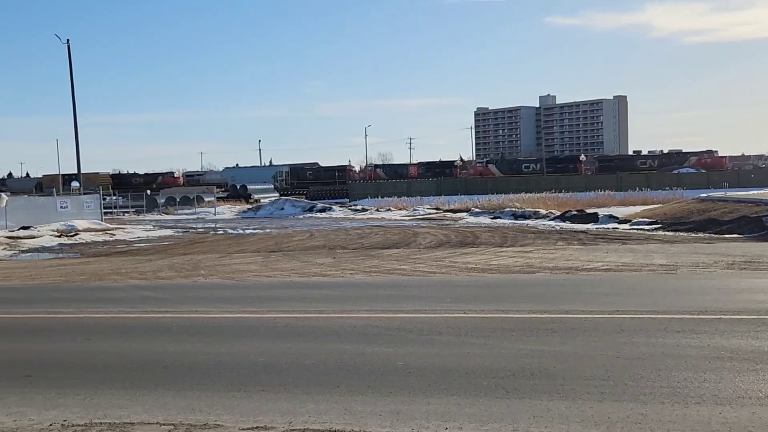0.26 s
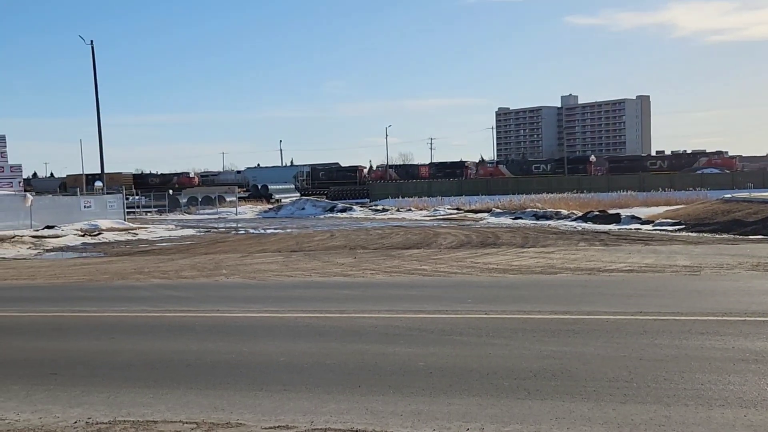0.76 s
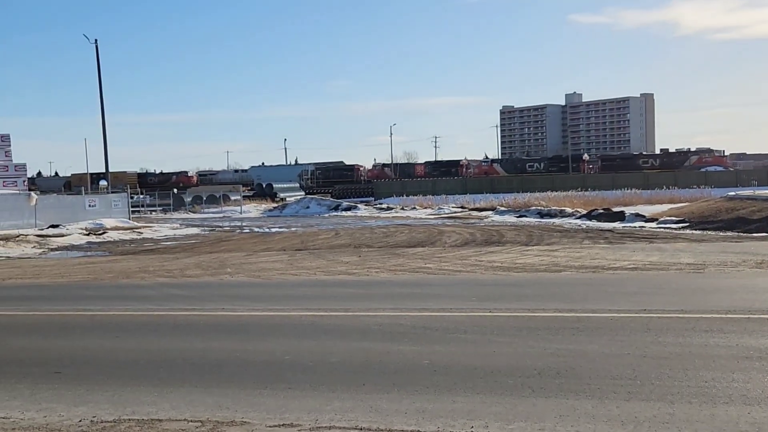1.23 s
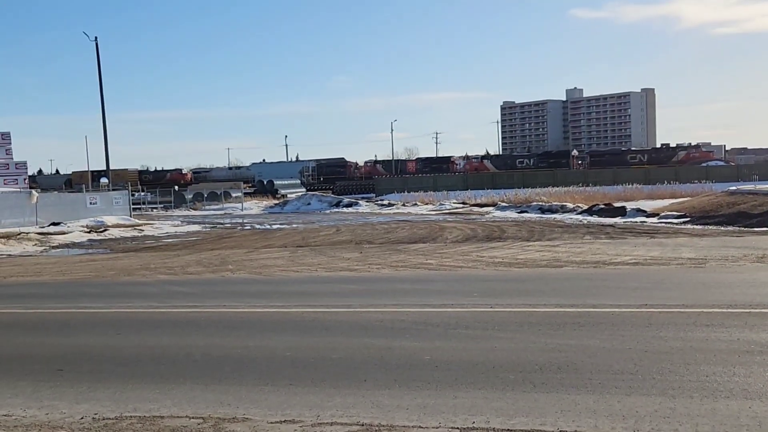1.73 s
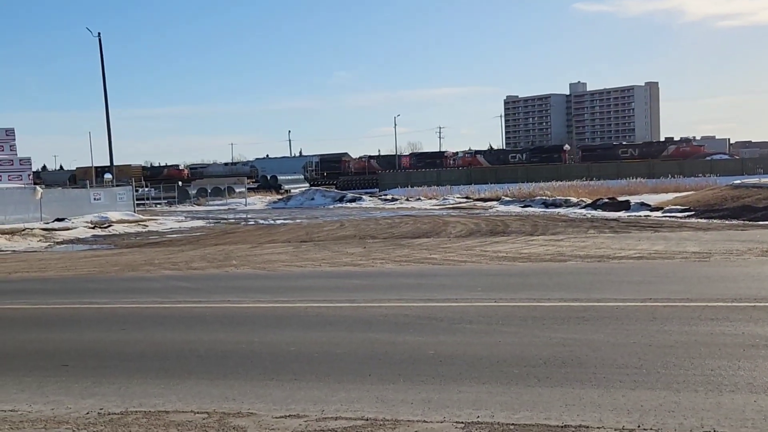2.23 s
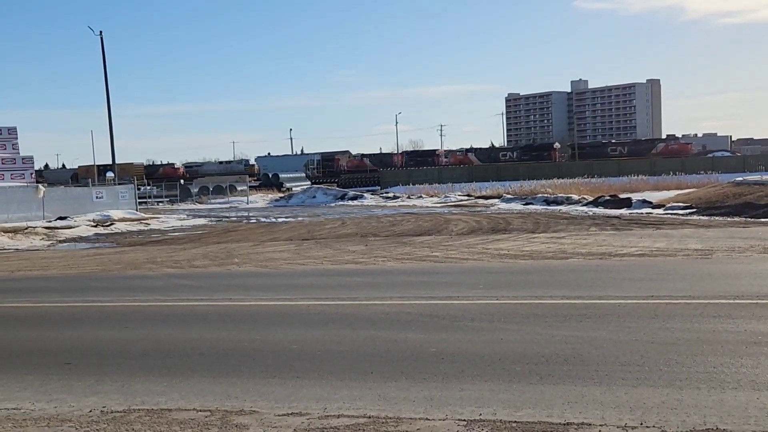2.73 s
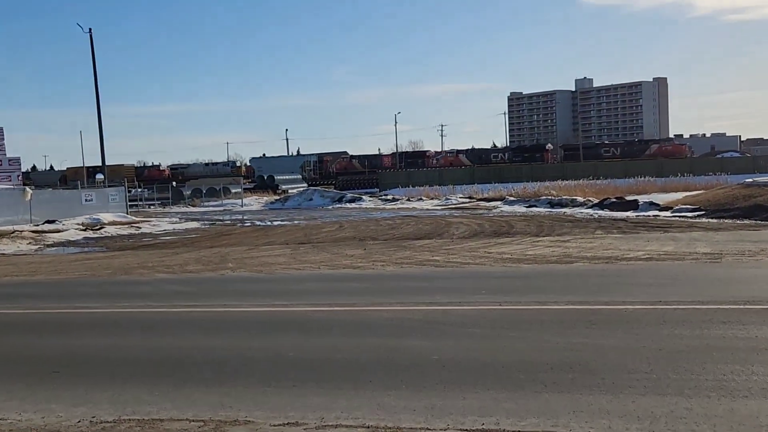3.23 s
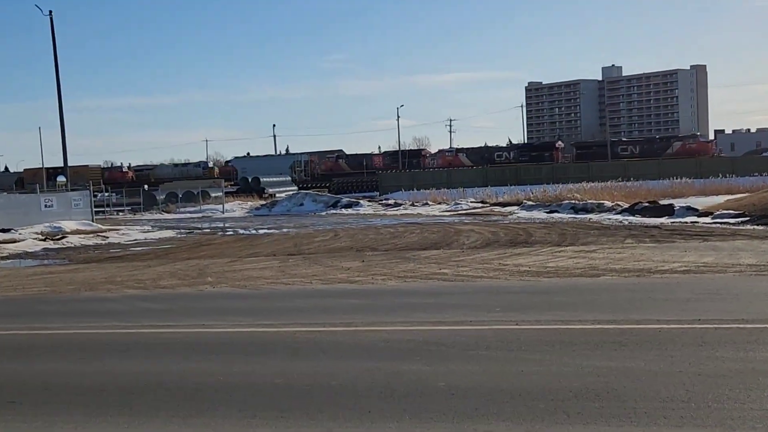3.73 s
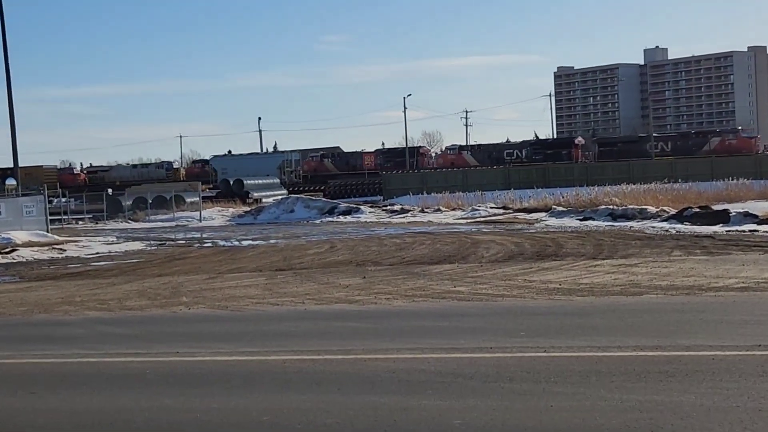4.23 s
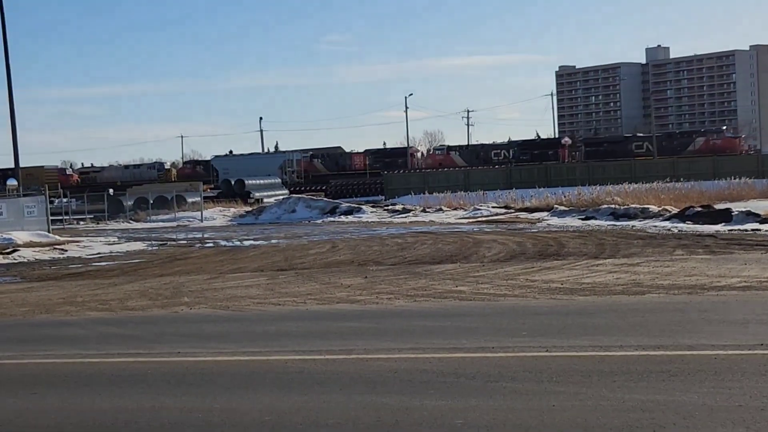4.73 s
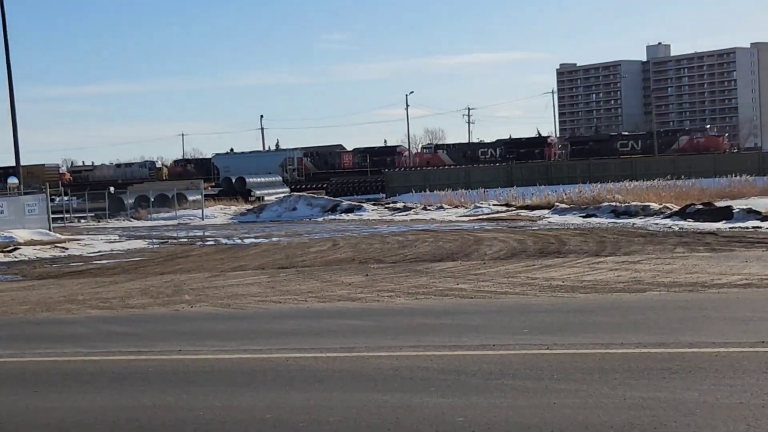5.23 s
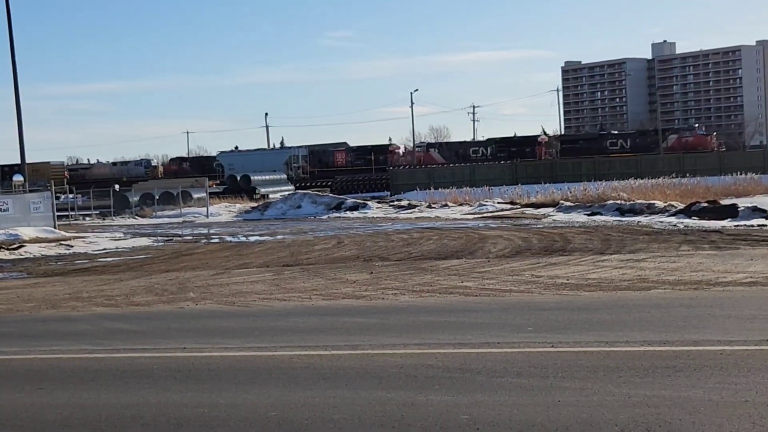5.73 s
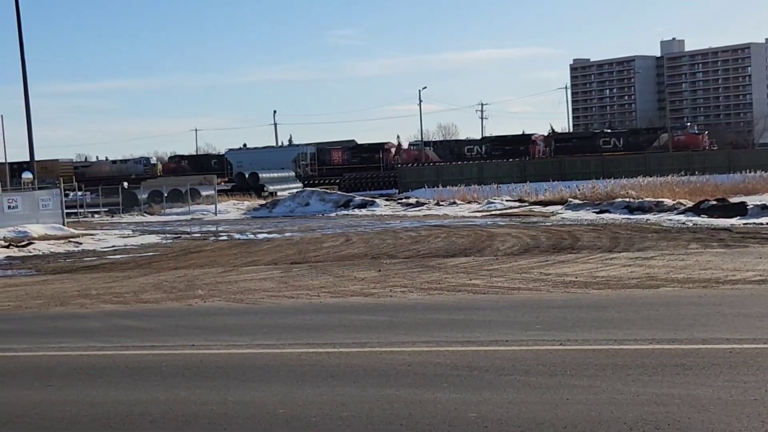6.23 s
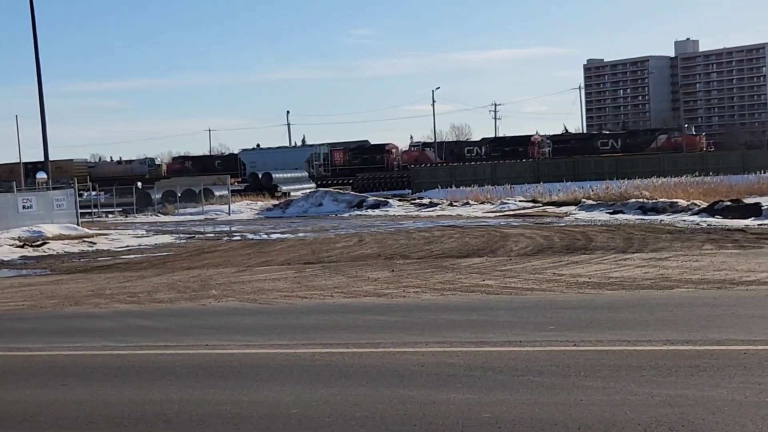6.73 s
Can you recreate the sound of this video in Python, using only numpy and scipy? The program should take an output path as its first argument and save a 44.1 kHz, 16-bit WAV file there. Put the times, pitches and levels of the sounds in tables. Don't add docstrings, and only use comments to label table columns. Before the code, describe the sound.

Freight locomotives rumble slowly across an open yard, wheels banging and ringing, as road noise recedes and fingers tick on the handheld phone.

```python
import sys
import numpy as np
from scipy import signal
from scipy.fft import rfft, irfft
from scipy.io import wavfile
from scipy.ndimage import uniform_filter1d

SR = 44100
rng = np.random.default_rng(int(sys.argv[2]) if len(sys.argv) > 2 else 0)


def boost(x):
    u = np.asarray(x, float) / 20
    return 10 ** u


def output_pcm(signal):
    pcm = np.clip(np.atleast_2d(signal).T, -1, 1) * 32767
    wavfile.write(sys.argv[1], SR, np.round(pcm).astype(np.int16))


N = 307377
FREQ = np.arange(N // 2 + 1) * SR / N + 1e-3
TIME = np.arange(N) / SR
ROAD, YARD = 1, 2


def curves(table):
    s, *columns = np.transpose(table)
    return [np.interp(TIME, s, column) for column in columns]


def along(table, axis=1):
    points = np.array(table)
    return np.interp(np.log(FREQ), np.log(points[:, 0]), points[:, axis])


def walk(rate):
    hold = int(SR / rate)
    steps = np.repeat(rng.standard_normal(N // hold + 1), hold)
    return 1.42 * uniform_filter1d(uniform_filter1d(steps, hold), hold)[:N]


def bell(start_s, length_s):
    return np.exp(-((TIME - start_s) / length_s) ** 2)


def ports(x, other, direction):
    # freq_hz, road left minus right [dB], yard left minus right [dB], yard likeness [0-1]
    shadow = [(323, 2, 0, 1), (560, -3.5, 0, 0.4), (980, -0.5, -1.5, 0.3), (1720, 0, -2, 0.7),
              (2280, -13.5, -4.5, 0.6), (3000, 5.5, 2, 0.6), (4300, 5.5, 1.5, 0), (6500, 6, 1.5, 0.1),
              (7840, -5.5, -7.5, 0.6), (12000, 1.5, 7.5, 0.4)]
    # freq_hz, road left lead [rad], yard left lead [rad], road likeness [0-1]
    bearing = [(340, 0.34, -0.0099, 0.7), (525, 0.44, 0.35, 0.4), (890, 1.92, -1.4, 1),
               (1020, 3.43, -0.27, 0.66), (1410, 3.31, -1, 0.86), (1740, 4.02, -0.64, .85),
               (1920, 3.6, 0, 0.5), (2120, 6, -0.76, 0.5), (2210, 6.5, -.4, 0.93), (2600, 7.5, -.4, 0.2),
               (3400, 11.2, -0.78, 0.7), (4000, 10.5, 0.19, 0.17), (5360, 16, -1.5, 1),
               (12000, 69, -2.9, 0.9)]
    like = np.clip(along(bearing if direction == ROAD else shadow, axis=3), 0, 1)
    turn = np.exp(.5j * along(bearing, direction))
    tilt = boost(along(shadow, direction) / 2)
    mid = np.sqrt((1 + like) / 2) * x
    side = np.sqrt((1 - like) / 2) * other
    return np.array([(mid + side) * turn * tilt, (mid - side) / turn / tilt])


def roar(colour, direction, swell_db, flicker_db, rate, hiss_db=np.zeros(N)):
    low_hz, high_hz = colour[0][0], colour[-1][0]
    gain = boost(along(colour)) * (FREQ > low_hz) * (FREQ < 1.1 * high_hz)
    both = ports(*rfft(rng.standard_normal((2, N))), direction) * gain
    norm = np.std(irfft(both, N))
    swell = walk(1.5)
    place = 2 * np.log2(FREQ)
    out = 0
    for band in range(int(2 * np.log2(low_hz)), int(2 * np.log2(high_hz)) + 2):
        part = irfft(both * np.clip(1 - abs(place - band), 0, 1), N)
        top = np.clip(band / 2 - np.log2(1000), 0, 1)
        flicker = flicker_db * (3 + 0.32 * top) * walk(rate)
        hiss = top * (1 + 0.35 * max(band / 2 - np.log2(4000), 0)) * hiss_db
        out = out + part * boost(swell_db * swell + flicker + hiss)
    return out / norm


def high_washes():
    # start_s, level_db, length_s
    washes = [(1.57, -72, 0.03), (0.01, -70, .15), (2.063, -73.5, .07), (2.553, -70, 0.032),
              (4.089, -73.5, .05), (4.829, -73.5, .05), (4.986, -76, .01), (5.046, -70, .05),
              (5.243, -75, 0.027), (5.383, -80.5, 0.13), (6.358, -79, 0.14), (6.658, -80.5, .04),
              (6.91, -75.5, 0.023)]
    pressure = boost(-98)
    for s, db, length in washes:
        rise = np.clip((TIME - s) / .012, 0, 1)
        pressure = pressure + boost(db) * rise * np.exp(-np.clip(TIME - s, 0, 1) / length)
    high_band = np.exp(-((FREQ - 12800) / 3000) ** 2 / 2)
    hiss = rfft(rng.standard_normal((2, N))) * high_band / np.sqrt(np.mean(high_band ** 2))
    return irfft(hiss, N) * pressure


def ticks():
    # start_s, peak_db, pitch_hz, width_hz, left minus right [dB]
    clicks = [(.059, -49, 11600, 2900, 4.5), (.135, -61, 13500, 2500, 5), (.208, -56.5, 14300, 2480, 1.5),
              (.357, -57.5, 14000, 3000, 3.5), (.431, -57, 14000, 3000, 6), (1.128, -45, 6360, 800, 17.5),
              (1.127, -49.5, 10500, 4500, 1.5), (1.573, -55, 13800, 3000, 4), (2.08, -57.5, 14000, 3000, 6),
              (4.083, -41, 12000, 5010, 9), (4.084, -48, 12200, 1200, 7), (4.083, -45.5, 6200, 2500, 7),
              (4.108, -59, 10000, 3600, -4), (4.6, -50, 5900, 5000, -1), (4.967, -62, 8000, 1996, 0),
              (5.0092, -32, 14600, 1800, 21), (5.0105, -47, 14500, 700, 23.5),
              (4.9965, -65.5, 14500, 2500, 19), (5.536, -55, 9500, 2000, -2), (5.715, -68, 9700, 1500, 0),
              (3.2586, -68, 11000, 3000, 0), (5.952, -69, 9500, 2000, -4), (4.091, -63, 12000, 4000, -2),
              (1.579, -57, 10800, 1200, 2), (1.58, -57, 13000, 1200, 2.5),
              (5.0097, -48.5, 11800, 2000, 7.5), (5.0095, -56, 8000, 2500, 1),
              (5.0458, -47, 13500, 2500, 9.5), (5.0458, -54, 8000, 2900, 5),
              (5.2454, -43.5, 4100, 900, -16), (5.2452, -55, 7500, 2000, -10),
              (5.2452, -39, 2200, 1500, -12), (1.262, -64.5, 13800, 1200, 4)]
    out = high_washes()
    t = np.arange(3500) / SR
    for s, db, hz, width_hz, pan_db in clicks:
        decay = np.pi * width_hz * t
        click = boost(db) * np.e * decay * np.exp(-decay) * np.sin(2 * np.pi * hz * t)
        pan = boost(np.array([[pan_db], [-pan_db]]) / 2)
        out[:, int(s * SR):int(s * SR) + len(t)] += click * pan
    return out


def pickup():
    # freq_hz, density [dB per Hz]
    tyres = [(350, -2), (480, -10.5), (680, -2), (900, -1), (1050, -3), (1500, -1.5), (2150, -10),
             (2600, -24.5), (3200, -26), (4200, -27), (5500, -28.5), (8500, -43.5), (11000, -43),
             (15000, -44)]
    passing_m, speed_m_s = 9.3, 16.1
    away_m = np.hypot(passing_m, speed_m_s * (TIME + .5))
    gain = np.hypot(boost(-32) * away_m[0] / away_m, boost(-42.5))
    air_db = 0.13 - 0.1049 * (away_m - away_m[0])
    return roar(tyres, ROAD, 0.18, 0.38, 15, air_db) * gain


def yard_drone():
    # freq_hz, density [dB per Hz]
    drone = [(350, -4), (480, -14), (680, 0), (900, -11.5), (1100, -14.5), (1500, -6), (2150, -10.5),
             (2600, -25), (3200, -30), (4200, -32), (5500, -36), (8500, -45), (11000, -57), (15000, -58.5)]
    clear_s, rise_db_per_s = 4.58, 3.5
    hidden_db = rise_db_per_s * np.minimum(TIME - clear_s, 0)
    return roar(drone, YARD, 0.35, 0.82, 16, -2.5 - 0.5 * hidden_db) * boost(-42 + hidden_db)


def plates():
    # start_s, pitch_hz, peak_db, t60_s
    singing = [(.918, 3000, -60, .08), (.943, 1410, -41.5, 0.2), (.94, 2050, -36, 0.16),
               (.958, 4960, -61, .06), (1.107, 1800, -37.5, .08), (3.875, 7040, -63, .1),
               (4.34, 5100, -57, .12), (4.345, 4000, -59, .2), (4.347, 1610, -39, 0.13),
               (4.554, 7450, -61, .1), (4.556, 5700, -64, .08), (4.777, 3800, -54.5, .15),
               (4.789, 1303, -42.5, 0.37), (5.05, 7430, -59, .1), (5.091, 1705, -44, 0.94),
               (5.155, 5400, -63, .1), (5.855, 3800, -64, .2), (6.34, 3700, -58.5, .3),
               (6.39, 5300, -62, .1), (6.21, 4100, -62, .15), (6.15, 2203, -47.5, 0.32),
               (.96, 3400, -57, .15), (.99, 1910, -44, .1), (5.372, 3820, -59, .25), (5.44, 1500, -43, .2),
               (5.532, 1720, -38, .1), (5.534, 5500, -60, 0.053), (6.656, 7600, -62.5, 0.09),
               (6.655, 1526, -33, .12), (6.66, 4060, -57, .15), (6.93, 7450, -65, .1)]
    out = np.zeros(N)
    t = TIME[:SR // 2]
    jolts = rng.standard_normal((len(singing), 2, len(t) // 30 + 1))
    for (s, hz, db, t60), jolt in zip(singing, jolts):
        size, turn = (np.interp(t * hz / 15, np.arange(len(j)), j) for j in jolt)
        shiver = .9 * min(1, .2 / t60)
        phase = 2 * np.pi * hz * t
        swing = (1 - shiver + shiver * size) * np.sin(phase) + shiver * turn * np.cos(phase)
        ring = boost(db) * np.clip(t / .008, 0, 1) * 1000. ** (-t / t60) * swing
        piece = out[int(s * SR):int(s * SR) + len(t)]
        piece += np.sqrt(2) * ring[:len(piece)]
    return rfft(out)


def clanks():
    # start_s, peak_db, rattle_s, extra treble [dB]
    joints = [(0.911, -30, 0.019, 0.5), (0.938, -27, 0.03, 0), (0.986, -33.5, 0.014, -4),
              (1.104, -30.5, 0.014, 0), (1.587, -37.5, 0.037, 2.5), (1.652, -46.5, 0.023, 4),
              (1.877, -37.5, .06, -4.5), (2.087, -33, 0.019, 0.5), (2.384, -39, 0.064, 4),
              (2.443, -44, 0.035, 2), (2.572, -46, 0.037, 6), (2.858, -37, 0.077, 5),
              (3.361, -39, 0.095, 3.5), (3.472, -45.5, .07, 8), (3.619, -37.5, 0.044, 1),
              (3.855, -39, .02, 8), (3.866, -37.5, .045, 4.5), (4.085, -47.5, 0.11, 11.5),
              (4.339, -32.5, 0.04, 0.5), (4.555, -33.5, 0.022, 0.5), (4.772, -27, 0.022, -3),
              (4.816, -38, 0.041, 3), (4.845, -40, 0.024, -2.5), (5.04, -28.5, 0.017, 1),
              (5.067, -43, .035, 2), (5.152, -42, .02, 2), (5.369, -33, .06, 0.5),
              (5.436, -31.5, 0.07, -4.5), (5.528, -25, 0.016, -4), (5.854, -32.5, 0.078, -2.5),
              (5.922, -33.5, 0.062, -2.5), (5.986, -40, 0.035, -1.5), (6.344, -32, 0.055, -8),
              (6.392, -40, 0.017, 4), (6.416, -34, 0.06, -5), (6.65, -27, .03, -3),
              (6.924, -36.5, 0.036, -5)]
    # freq_hz, density [dB per Hz]
    steel = [(900, -18), (1300, -3), (1600, 0), (2150, -6), (2700, -14.5), (3200, -19), (3900, -22),
             (4600, -24.5), (5300, -26.5), (6300, -29), (7700, -32), (9000, -42), (10500, -73.5)]
    # pitch_hz, level_db, t60_s
    rings = [(1154, -11, 0.062), (1323, -9, 0.087), (1464, -4, 0.077), (1694, -11.5, 0.37),
             (1872, -6.5, 0.17), (2173, -11, 0.087), (2310, -17.5, 0.097), (3000, -26, .06),
             (3460, -27, 0.073), (3800, -27, 0.04), (4300, -32.5, 0.066), (5300, -37, .06),
             (6300, -39.5, .05), (7440, -42.5, .04)]
    s, db, hold, extra_db = (column[:, None] for column in np.transpose(joints))
    treble_db = -21.5 - 0.02 * (db + 34.0) + extra_db
    coarse = TIME[::32] - s
    tail = 1000. ** (-np.clip(coarse - hold, 0, 9) / .18)
    blow = boost(3.5 * np.exp(-abs(coarse) / 0.012))
    shapes = np.clip(coarse * 170, 0, 1) * tail * blow
    luck = boost(4.5 * np.clip(rng.standard_normal((len(joints), len(rings))), -3, 1.3))

    def shake(weight, ring_on=1):
        knocks = rng.standard_normal((2, N)) * boost(1.86 * walk(160))
        envelope = (shapes ** ring_on * weight).sum(0)
        return rfft(knocks * np.interp(TIME, TIME[::32], envelope))

    split = np.clip(np.log2(FREQ / 2500) * 4, 0, 1)
    body = boost(along(steel)) * (FREQ > steel[0][0])
    low, high = (body * w / np.sqrt(np.mean((body * w) ** 2)) for w in (1 - split, split))
    hits = boost(-13.0) * low * shake(boost(db))
    hits = hits + boost(-6.5) * high * shake(boost(db + treble_db), ring_on=0.54)
    for k, (hz, ring_db, t60) in enumerate(rings):
        resonance = 1 / (1 + 1j * (FREQ - hz) * t60 * 2 * np.pi / np.log(1000))
        mode = resonance * (abs(FREQ / hz - 1) < .3)
        hits = hits + boost(ring_db + 10.0) * mode * shake(boost(db) * luck[:, [k]])
    singing = plates() * np.array([[1], [.5j]])
    return irfft(ports(*(hits + singing), YARD), N)


def strands():
    # centre_s, pitch_hz, peak_db, length_s
    swells = [(.47, 59.1, -18.5, 0.071), (.95, 58.5, -17.5, 0.089), (1.12, 53, -23, 0.094),
              (1.6, 55.9, -20, 0.11), (1.85, 54.4, -23.5, 0.11), (2.4, 48.8, -23.5, 0.18),
              (2.85, 56.7, -19, 0.086), (3.02, 68.7, -22.5, 0.07), (3.22, 48, -20.5, 0.07),
              (3.5, 54.3, -16, 0.071), (3.85, 68, -21, 0.094), (4.05, 55.5, -27, 0.17),
              (4.33, 46, -21.5, 0.12), (4.68, 68.4, -27.5, .1), (4.95, 68.45, -20, 0.18),
              (5.4, 49.8, -22.5, 0.18), (5.45, 68.6, -27, 0.091), (5.6, 54.7, -20.5, 0.09),
              (5.85, 69.2, -21, 0.11), (5.92, 53.8, -14, 0.12), (6.2, 55, -22.5, 0.1),
              (6.5, 47.7, -18, 0.084), (6.7, 66.1, -17, .14), (0.301, 88.6, -31, 0.14),
              (1.3, 62, -25, 0.11), (3.45, 72.2, -29, .08), (0.15, 60, -26, 0.06),
              (.55, 151.5, -28.5, 0.12), (.55, 189.3, -32.5, 0.062), (2.4, 93.5, -28, 0.17),
              (2.4, 149.7, -32, 0.08), (2.62, 100, -31.5, .08), (4.648, 88.6, -30, 0.048),
              (4.8, 107.8, -27.5, 0.091), (3.619, 73.3, -25, 0.057), (.75, 70.7, -31, .07),
              (2.9, 149, -27, 0.073), (3.2, 198, -34, 0.082), (3.42, 150, -25.5, 0.085),
              (5.48, 150.4, -23.5, 0.068), (5.5, 175.8, -24, 0.065), (5.45, 201.1, -30, 0.17),
              (5.8, 152.3, -31, 0.086), (6.3, 91.5, -31, 0.084), (6.45, 115.3, -24.5, 0.062),
              (2.619, 56, -23.5, .07), (2.1, 56, -24.5, .05), (3.081, 55.2, -22.5, .06),
              (3.749, 52, -24, 0.063), (4.8, 49.9, -24.5, 0.064)]
    out = np.zeros(N)
    for s, hz, db, length in swells:
        tone = np.sin(2 * np.pi * (hz * (TIME - s) + rng.random()))
        out += np.sqrt(2) * boost(db) * bell(s, length) * tone
    return out


def engine(cycle_hz, db, orders, order_db, waver_db, waver_rad):
    cycle = 2 * np.pi * np.cumsum(cycle_hz) / SR
    lines = np.zeros(N)
    for k, rel_db in zip(orders, order_db):
        level = boost(rel_db + waver_db * walk(1.402))
        lines += level * np.sin(k * cycle + waver_rad * walk(1.133) + 2 * np.pi * rng.random())
    return np.sqrt(2) * lines * boost(db)


def diesels():
    # start_s, far_cycle_hz, lead_cycle_hz
    speeds = [(0, 5.52, 5.2), (1.2, 5.5, 5.21), (2.2, 5.47, 5.25), (3.6, 5.55, 5.36), (4.2, 5.58, 5.35),
              (5.3, 5.52, 5.3), (6.97, 5.48, 5.2)]
    # start_s, far_db, lead_db
    levels = [(0, -34.5, -38.5), (.6, -28.5, -28.5), (1.2, -23.5, -37.5), (1.8, -29.5, -31),
              (2.4, -28.5, -33), (3, -23, -34.5), (3.6, -25.5, -26), (4.3, -26, -28.5), (4.8, -32.5, -29),
              (5.25, -21.5, -30.5), (5.9, -26, -26), (6.25, -25.5, -28), (6.7, -32, -24.5),
              (6.97, -26.5, -26)]
    far_orders = [5, 6, 7, 8, 9, 10, 11, 19, 21, 27]
    far_order_db = [-17, -15.5, -19, -10.5, -9, -3, -8, -17, -24, -24.5]
    lead_orders = [7, 9, 11, 13, 14, 17, 19, 28, 30, 32, 36, 38, 40]
    lead_order_db = [-13.5, -10.5, -7, -7.5, -5, -7.5, -14, -13, -16.5, -10, -11.5, -9, -10]
    # freq_hz, density [dB per Hz]
    rumble_colour = [(18, -30), (29, -32.5), (40, -8.5), (55, -9), (75, -7), (95, -9), (130, -14),
                     (200, -14.5), (250, -21), (386, -32), (461, -41.5), (600, -38)]
    # centre_s, gain_db, length_s
    surges = [(0.031, 6, 0.039), (0.441, 4, 0.025), (0.603, 6.5, 0.046), (0.942, 5.5, 0.11),
              (1.558, 1, 0.04), (1.892, 4, 0.09), (2.094, 2.5, 0.033), (2.387, 7, 0.02), (3.222, 4, 0.021),
              (3.481, 2, 0.055), (4.321, 5, 0.03), (4.703, 5.5, 0.14), (5.505, 2.5, 0.095),
              (5.696, -0.5, 0.028), (5.928, 5.5, 0.047), (6.171, 0, 0.022), (6.715, 0, 0.027)]
    (far_hz, lead_hz), (far_db, lead_db) = curves(speeds), curves(levels)
    far = engine(far_hz, far_db, far_orders, far_order_db, waver_db=2.2, waver_rad=.45)
    lead = engine(lead_hz, lead_db, lead_orders, lead_order_db, waver_db=1.1, waver_rad=.3)
    nearing_db = -26.22 + 0.66 * TIME
    rumble = roar(rumble_colour, YARD, 0.2, 0.41, 8) * boost(nearing_db)
    sound = rfft(far + lead + rumble)
    surge_db = sum(db * bell(s, length) for s, db, length in surges)
    deep = np.clip((88 - FREQ) / 16, 0, 1)
    boom = irfft(sound * deep, N) * boost(1.1 * surge_db)
    upper = irfft(sound * (1 - deep), N) * boost(0.4 * surge_db)
    side = np.array([[.5], [-.5]])
    pan_db, lag_rad = .4, .2
    return irfft(rfft(boom + upper + strands()) * boost(pan_db * side) * np.exp(-1j * lag_rad * side), N)


def scene():
    # freq_hz, gain_db
    cavities = [(2900, 1), (3250, -2.5), (3600, 0), (4100, 2), (4650, -3), (5300, 2), (5800, -3), (6400, 1),
                (7000, -2), (7800, 2), (8900, 1), (10000, -3)]
    outdoors = rfft(pickup() + yard_drone() + clanks())
    return diesels() + irfft(outdoors * boost(along(cavities)), N) + ticks()


def low_pass(x):
    return signal.sosfilt(signal.butter(12, 15760, fs=SR, output="sos"), x)


def record(dry):
    limited = np.tanh(0.91 * dry) / 0.96
    return low_pass(limited)


dry = scene()
out = record(dry)
output_pcm(out)
```